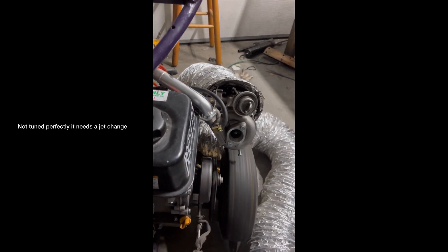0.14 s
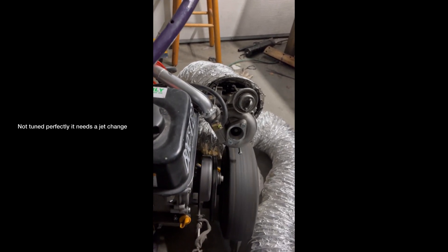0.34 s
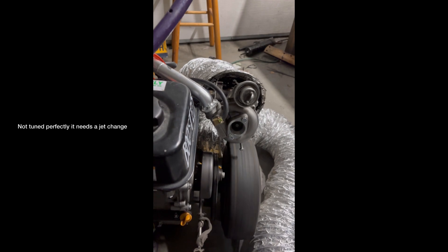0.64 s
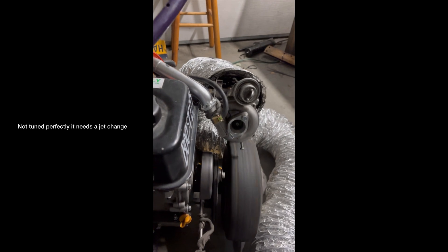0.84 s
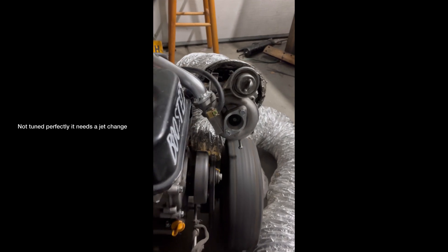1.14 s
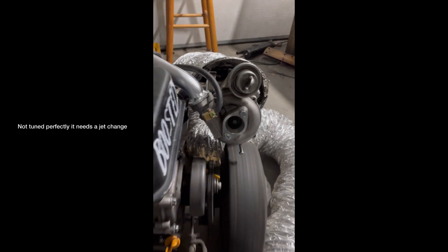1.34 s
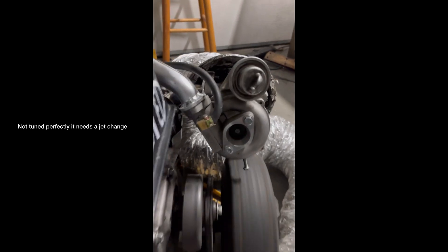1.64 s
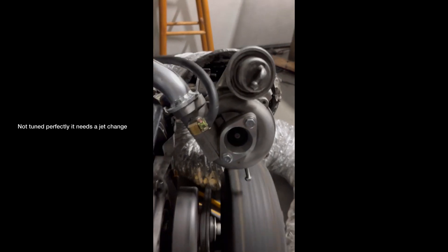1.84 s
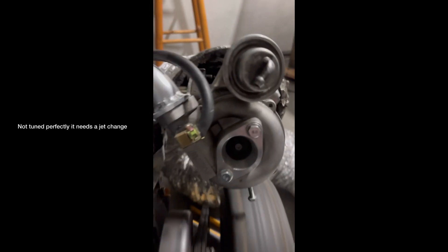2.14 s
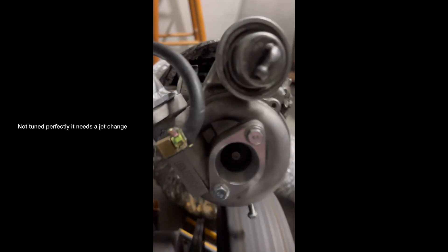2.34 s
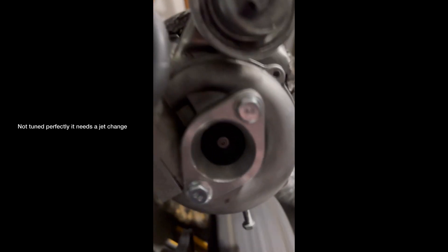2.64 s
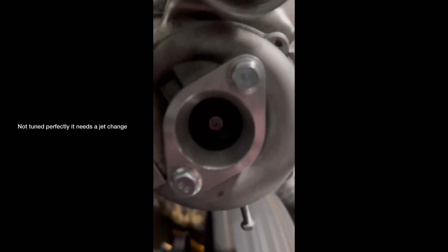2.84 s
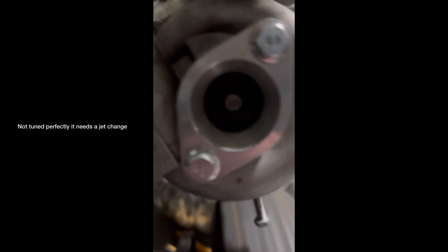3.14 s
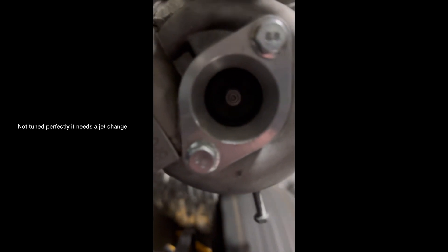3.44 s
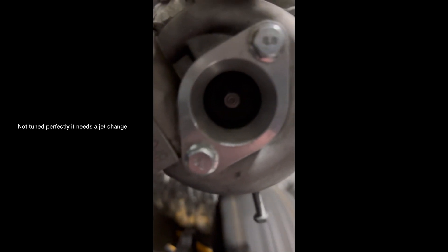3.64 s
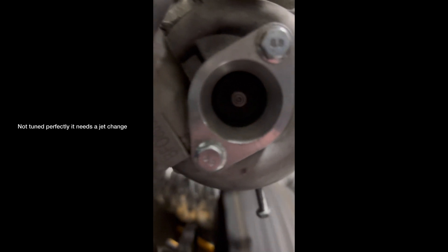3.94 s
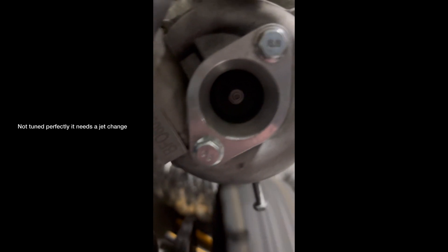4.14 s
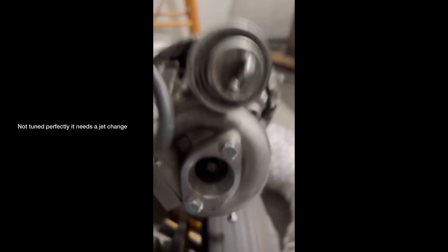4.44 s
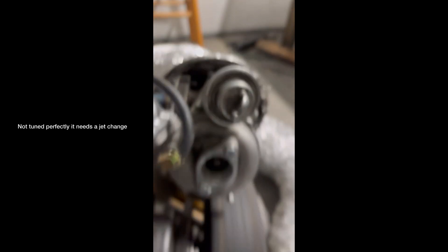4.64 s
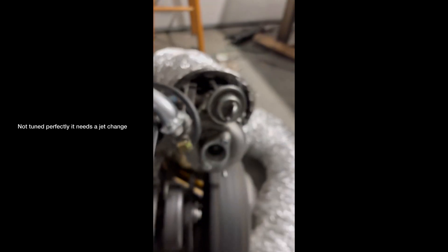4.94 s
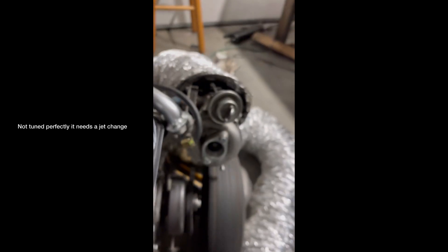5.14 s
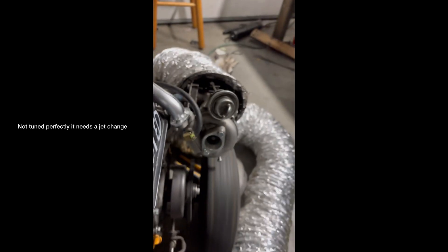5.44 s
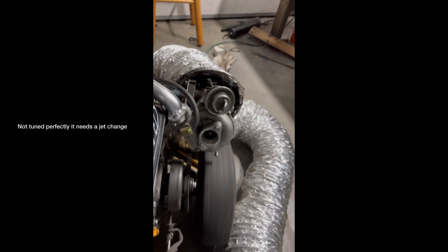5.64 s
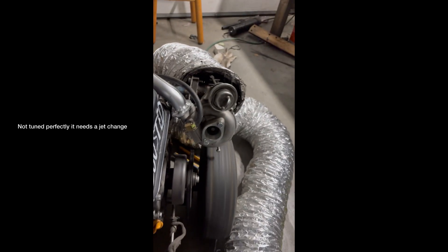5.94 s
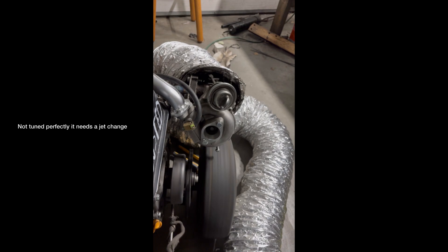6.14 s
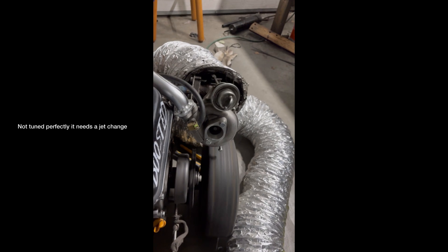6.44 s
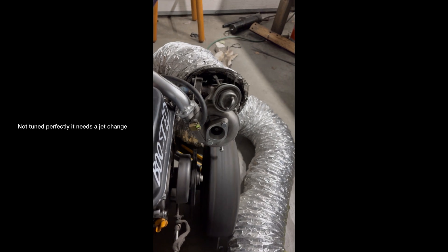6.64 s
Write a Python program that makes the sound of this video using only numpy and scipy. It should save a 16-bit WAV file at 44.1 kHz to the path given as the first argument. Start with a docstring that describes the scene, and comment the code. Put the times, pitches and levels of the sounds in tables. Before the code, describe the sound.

Garage engine climbs from quick chugging to a steady raspy buzz, air fluttering and thumping the microphone up close, then backing away.

```python
"""Turbocharged single in a garage

A small four-stroke single revs up and holds about 5400 rpm while a phone nears the turbo inlet and backs away.
Each cycle strikes resonances: soft low thump, exhaust crack and pop, valve thud and clack, intake gulp.
Coloured noise, swelling with the cycle, makes clatter, gas hiss, turbo rasp and a metallic tick.
Noise bands flutter as moving air; draught, gusts and slaps buffet the microphone; hard walls add a dull wash."""
import sys
import numpy as np
from scipy import signal
from scipy.fft import rfft, irfft
from scipy.io import wavfile
from scipy.ndimage import uniform_filter1d

SR = 44100
rng = np.random.default_rng(int(sys.argv[2]) if len(sys.argv) > 2 else 0)


def transcribe(signal):
    """Save signal, clipped to [-1, 1], as a 16-bit WAV file at the path in sys.argv[1]."""
    frames = np.atleast_2d(signal).T
    limited = np.clip(frames, -1, 1)
    pcm = np.round(limited * 32767).astype(np.int16)
    wavfile.write(sys.argv[1], SR, pcm)


N = 299439
TIME_S = np.arange(N) / SR
FREQ_HZ = np.maximum(np.arange(N // 2 + 1) * SR / N, 1e-3)
SIDES = np.array([[1], [-1]])  # left, right


def undb(db):
    """Decibels to gain."""
    return 10 ** (np.asarray(db) / 20)


def unit(x):
    """Scale to rms 1."""
    return x / np.sqrt(np.mean(x ** 2))


def curves(table):
    """Columns of a timed table, interpolated to every sample."""
    time_s, *columns = np.transpose(table)
    return [np.interp(TIME_S, time_s, column) for column in columns]


def colour(points):
    """Gain at every frequency from (Hz, dB) points, linear in log frequency."""
    hz, db = np.transpose(points)
    return undb(np.interp(np.log(FREQ_HZ), np.log(hz), db))


def resonance(hz, width_hz):
    """Band-pass response, squared for steep skirts."""
    detuning = (FREQ_HZ / hz - hz / FREQ_HZ) * hz / width_hz
    return 1 / (1 + 1j * detuning) ** 2


def walk(rate_hz):
    """Smooth random drift of rms 1, low-passed around rate_hz."""
    noise = rfft(rng.standard_normal(N))
    return unit(irfft(noise * np.exp(-(FREQ_HZ / rate_hz) ** 2), N))


def bump(at_s, length_s):
    """Gaussian swell of peak 1, about length_s long."""
    return np.exp(-2 * ((TIME_S - at_s) / length_s) ** 2)


def puff(cycle, at_turns, length_turns):
    """Swell once per cycle: starts at at_turns, peaks at 1 length_turns later, dies away."""
    age = (cycle - at_turns) % 1 / length_turns
    return age ** 2 * np.exp(2 * (1 - age))


def even(x, span_s=0.013):
    """Divide out the noise's own loudness swings."""
    power = np.mean(x ** 2, axis=0)
    for _ in range(2):
        power = uniform_filter1d(power, int(span_s * SR))
    return x / np.sqrt(power + 1e-9)


# two microphone ports: (frequency [Hz], left minus right [dB], left lead [rad], likeness [0-1])
PORT_PAIR = [(110, -.5, 0, .975), (280, .2, 0, .8), (650, 2.5, -.1, .3), (1300, 2.8, -.2, .35),
             (1800, .5, .1, .65), (2700, -1.5, 2.7, .72), (3600, -1, 1.7, .45), (5100, 0, 1.3, .55),
             (5900, 0, 3.14, .98), (8200, 0, 6.28, .88), (10750, 0, 9.42, .99), (13600, 0, 12.57, .97),
             (15500, 0, 15.3, .9)]


def port_noise(gain):
    """Coloured stereo noise, rms 1: a shared part offset in phase plus a separate part per port."""
    hz, *columns = np.transpose(PORT_PAIR)
    pan_db, lead_rad, alike = (np.interp(FREQ_HZ, hz, column) for column in columns)
    alike = np.clip(alike, 0, 1)
    noise = rfft(rng.standard_normal((3, N)))
    shared = np.sqrt(alike) * noise[0] * np.exp(.5j * SIDES * lead_rad)
    separate = np.sqrt(1 - alike) * noise[1:]
    return unit(irfft((shared + separate) * gain * undb(SIDES * pan_db / 2), N))


def strokes(cycle, at_turns, modes, gain):
    """Spectrum of one slightly uneven pulse per cycle, ringing the given modes."""
    turns = np.arange(int(cycle[-1] - at_turns) + 1)
    jitter_s, size_db = (rng.standard_normal((400, 2)) * [.00002, .6])[turns].T
    place = np.clip((np.interp(turns + at_turns, cycle, TIME_S) + jitter_s) * SR, 0, N - 2)
    # split each pulse over two samples for sub-sample timing
    first, late, size = place.astype(int), place % 1, undb(size_db)
    pulses = np.bincount(first, size * (1 - late), N) + np.bincount(first + 1, size * late, N)
    ringing = sum(np.sign(polarity) * undb(db) * resonance(hz, width_hz)
                  for hz, width_hz, db, polarity in modes)
    return rfft(pulses * gain) * ringing


# pulse positions in the cycle [turns]
THUMP_AT, CRACK_AT, EXHAUST_AT = .005, .216, .244
CHINK_AT, VALVE_AT, INTAKE_AT = .556, .565, .571
# modes rung by each pulse: (frequency [Hz], width [Hz], level [dB], polarity [sign])
CRACK_MODES = [(1410, 1470, -20, -1.0)]
EXHAUST_MODES = [(140.2, 80, -6, -1.0), (467, 460, -8, -1.0), (831, 150, -18, -1.0)]
VALVE_MODES = [(380, 230, 3.5, -1.0)]
CLACK_MODES = [(338, 1450, -14, 1.0), (1430, 1200, -16.5, 1.0), (3100, 460, -43, 1.0)]
INTAKE_MODES = [(67.5, 18.3, 2.4, 1.0), (112.4, 77.5, -1, -1.0), (220, 65, -8, -1.0),
                (359.3, 187, 1.5, 1.0)]
THUMP_MODES = [(445, 440, -17, -1.0)]
# strength of the exhaust-opening crack: (time [s], level [dB])
CRACK_STRENGTH = [(0, 5), (1.7, 1.3), (3.3, 6.1), (6.79, 2.3)]
# strength of the valve clack's hard edge: (time [s], level [dB])
CLACK_STRENGTH = [(0, -17), (1.6, -3), (2.3, 2), (3.3, -1), (3.9, 6.5), (4.5, 2.5), (6.79, -1.5)]
# beat against phone place: (time [s], beat re engine loudness [dB], bass [dB], valve thud [dB])
PHONE_PLACE = [(0, 2, -1, -5.5), (.6, 6.5, 1.5, -4.5), (1.1, 4.5, 0, -2.5), (1.75, 5, 2.5, 1.5),
               (2.3, 5, 3, 3.5), (2.75, 6, -6.5, -1), (3.25, 4, -12, 1), (3.65, 0, -12, 0),
               (3.88, -2.5, -5, -1), (4.25, -1, -5.5, 0), (4.62, 2, -12, 1.5), (5, 4, -2, 3),
               (5.4, 3.5, 1.5, 2), (6.79, 6.5, -2, -2)]
# beat's stereo balance: (frequency [Hz], left minus right [dB])
BEAT_BALANCE = [(130, -.7), (220, -.8), (380, .2), (700, 4), (1280, 4), (2300, -2)]
# standing waves between engine, floor and ducting:
# (frequency [Hz], level at first place [dB], level later [dB])
STANDING_WAVES = [(55.3, 15, 5), (71, -3.5, -8), (89.4, 4.5, 4.5), (136, -3, 1.5), (182, -1, -5),
                  (250, 7.5, 2.5), (299, -0.5, 5), (354, 0.5, -6), (415.5, 5, 5.5), (433, -0.5, 5),
                  (483, 5.5, 0), (546, 4.5, 5), (614, 2.5, -1), (656, 3.5, 8.5), (720, 6.5, 5), (810, 4, 6),
                  (900, -5, -1.5), (924, 7, 5.5), (1140, 0, 0.5), (1350, 1, 1.5), (1820, 4, -5),
                  (2000, -27, 2.5), (2270, -13, -9)]
MOVE_FROM_S, MOVE_TO_S = 1.3, 2.2  # phone leaves its first place


def beat(cycle):
    """Exhaust crack and pop, valve thud and clack, intake gulp and a soft low thump ring once a cycle."""
    place_db, _, valve_db = curves(PHONE_PLACE)
    spectrum = (strokes(cycle, CRACK_AT, CRACK_MODES, undb(curves(CRACK_STRENGTH)[0]))
                + strokes(cycle, EXHAUST_AT, EXHAUST_MODES, 0.99)
                + strokes(cycle, VALVE_AT, VALVE_MODES, undb(valve_db))
                + strokes(cycle, VALVE_AT, CLACK_MODES, undb(curves(CLACK_STRENGTH)[0]))
                + strokes(cycle, INTAKE_AT, INTAKE_MODES, 0.97)
                + strokes(cycle, THUMP_AT, THUMP_MODES, 1))
    spectrum = spectrum * colour(BEAT_BALANCE) ** (SIDES / 2)
    hz, *places = np.transpose(STANDING_WAVES)
    first, later = (irfft(spectrum * colour(np.c_[hz, db]), N) for db in places)
    moved = np.interp(TIME_S, [MOVE_FROM_S, MOVE_TO_S], [0, 1])
    return unit((1 - moved) * first + moved * later) * undb(place_db)


def thin(x, bass_hz=260):
    """Rescale the bass by phone place: close to the inlet the engine loses it."""
    bass = irfft(rfft(x) / (1 + np.square(FREQ_HZ / bass_hz) ** 2), N)
    return x + (undb(curves(PHONE_PLACE)[1]) - 1) * bass


# level of the hollow boom: (time [s], level [dB])
BOOM_STRENGTH = [(0, -34), (.95, -31.5), (1.3, -61), (5, -66), (5.6, -43)]


def boom(cycle, hz=176, width_hz=32):
    """Each exhaust pop rings one narrow hollow mode, lost as the phone moves in."""
    ringing = irfft(strokes(cycle, EXHAUST_AT, [(hz, width_hz, 0, 1)], 1), N)
    return unit(ringing) * undb(curves(BOOM_STRENGTH)[0])


# rattle colour: (frequency [Hz], level per Hz [dB])
CLATTER_COLOUR = [(25, -50), (50, -20), (100, -30), (180, -2), (260, 5.5), (360, -5.5), (700, 0.5),
                  (1100, -1), (1700, -5), (2400, -4), (3300, -8), (5000, -37), (9000, -46)]
SHAKE_AT = .22  # turns


def clatter(cycle, swell=1.23, length_turns=0.12, db=1.06, uneven_db=1.1):
    """Casing, chain and ducting rattle: steady noise shaken unevenly just after each exhaust opening."""
    sizes = undb(uneven_db * rng.standard_normal(int(cycle[-1]) + 2))
    firing = sizes[(cycle - SHAKE_AT + 1).astype(int)]
    shake = 1 + swell * firing * puff(cycle, SHAKE_AT, length_turns)
    return unit(port_noise(colour(CLATTER_COLOUR)) * shake) * undb(db)


# tick colour: (frequency [Hz], level per Hz [dB])
CHINK_COLOUR = [(500, -26), (1000, 7), (1800, -5), (2600, 9.5), (3500, 9), (4500, 2.5), (5300, -23),
                (6500, 11), (9000, 0), (15000, -22)]
# tick level at the phone: (time [s], level [dB])
CHINK_STRENGTH = [(0, -60), (1.4, -53), (2.1, -30), (3.0, -38), (4.2, -36), (4.8, -43), (6.79, -46)]


def chink(cycle, length_turns=0.026, uneven_db=2.5):
    """Short bright noise burst with every valve clack: a metallic tick, loudest beside the turbo."""
    tick = port_noise(colour(CHINK_COLOUR)) * puff(cycle, CHINK_AT, length_turns)
    return unit(tick * undb(uneven_db * walk(40))) * undb(curves(CHINK_STRENGTH)[0])


# rasp swells with boost, fades as the engine settles
RASP_DB, RASP_PEAK_S, RASP_HOLD_S = -29, 2.08, 0.26
RASP_RISE_DB_PER_S, RASP_FALL_DB_PER_S = 24, 24
# whistle when the phone faces the inlet: (peak time [s], length [s], pitch at peak [Hz], level [dB])
WHISTLE_SWELLS = [(2.87, 0.14, 8900, -36.5), (3.96, 0.32, 8680, -38.5)]
WHISTLE_SAG_HZ_PER_S = 550


def turbo(cycle, rasp_hz=4600, rasp_width_hz=3600, length_turns=0.076, uneven_db=1, blur_hz=260):
    """Blowdown rasps through the turbine as pulsed band noise; the wheel adds a breathy, sagging whistle."""
    rising_s = np.maximum(RASP_PEAK_S - TIME_S, 0)
    falling_s = np.maximum(TIME_S - RASP_PEAK_S - RASP_HOLD_S, 0)
    rasp_db = RASP_DB - RASP_RISE_DB_PER_S * rising_s - RASP_FALL_DB_PER_S * falling_s
    rasp = port_noise(resonance(rasp_hz, rasp_width_hz)) * puff(cycle, 0.15, length_turns)
    out = unit(rasp * undb(uneven_db * walk(35))) * undb(rasp_db)
    for at_s, length_s, hz, db in WHISTLE_SWELLS:
        turns = np.cumsum(hz - WHISTLE_SAG_HZ_PER_S * (TIME_S - at_s)) / SR
        whistle = unit(walk(blur_hz) * np.sin(2 * np.pi * turns))
        out = out + whistle * bump(at_s, length_s) * undb(db)
    return out


# hiss colour: (frequency [Hz], level per Hz [dB])
HISS_COLOUR = [(800, 5), (2000, -6), (2700, 4), (4000, 5), (5300, 4.5), (6700, 3.5), (8700, 4), (10700, 1),
               (12600, 8), (14000, 3), (15500, -5)]


def hiss(cycle, swell=0.47, flicker_db=1.0, db=1.08):
    """Steady cooling-air noise plus a gust of gas through the turbo each exhaust stroke."""
    flow = (1 + swell * puff(cycle, 0.29, 0.1)) * undb(flicker_db * walk(33))
    return unit(port_noise(colour(HISS_COLOUR)) * flow) * undb(db)


# airstream flutter: (time [s], centre [Hz], level [dB])
FLUTTER_PATH = [(1.55, 251, -54), (1.85, 285, -36), (2.35, 295, -31), (2.55, 298, -18), (3.03, 273, -16.5),
                (3.22, 328, -21.5), (3.42, 516, -21.5), (3.72, 604, -22), (3.86, 596, -33),
                (3.96, 560, -39), (4.06, 530, -29.5), (4.3, 550, -50)]
SURGE_AT, GULP_AT = .21, .54  # air surges out, in [turns]


def airstream(cycle, pulses, gust_db=2.0, exhaust_swell=1.3, intake_swell=2.2, length_turns=0.08,
              octaves=0.33, throb_db=-7):
    """Air at the phone: noise and beat in a moving band, the noise surging with exhaust and intake."""
    centre_hz, flutter_db = curves(FLUTTER_PATH)
    eddies, throb, spectrum = 0, 0, rfft(pulses)
    for hz in 200 * 2 ** np.arange(0, 2.1, .5):
        band = resonance(hz, hz * 0.69)
        share = np.exp(-.5 * (np.log2(hz / centre_hz) / octaves) ** 2)
        eddies = eddies + share * port_noise(band)
        throb = throb + share * unit(irfft(spectrum * np.abs(band), N))
    surges = (1 + exhaust_swell * puff(cycle, SURGE_AT, length_turns)
              + intake_swell * puff(cycle, GULP_AT, length_turns))
    flutter = unit(even(eddies) * surges * undb(gust_db * walk(75.0)))
    return (flutter + undb(throb_db) * unit(throb)) * undb(flutter_db)


# steady draught while the phone is close: (time [s], level [dB])
DRAUGHT_LEVEL = [(1.62, -56), (1.8, -35), (2.3, -26), (2.92, -19.5), (3.08, -36.5), (3.6, -38.5),
                 (4.45, -39.5), (4.7, -46)]
# single gusts: (peak time [s], level [dB], small eddies re big [dB])
GUST_PEAKS = [(1.735, -25, -8), (1.817, -16, -17), (1.857, -11, -13), (1.95, -16, -12), (2.0, -17, -5),
              (2.092, -15, -7), (2.255, -12.5, -13), (2.307, -12, -16), (2.347, -16, -6), (2.419, -20, -15),
              (2.476, -18, 7), (2.515, -9.5, -14), (2.586, -10.5, -0.5), (2.738, -18, -1), (2.8, -18, 3),
              (2.844, -19, 5), (2.941, -12.5, -7), (2.996, -23, -2), (4.76, -34, 5)]
GUST_RISE_S, GUST_FALL_S = .013, .024
# buffet colour: (frequency [Hz], level per Hz [dB])
BUFFET_COLOUR = [(15, -39), (28, -10), (42, 0), (65, 7), (100, 0.5), (140, -.5), (250, -18.5), (500, -17),
                 (1500, -45)]


def rumble(split_hz=115, patchy_db=2, patchy_hz=25, edge_s=0.085, small_eddies_db=-3):
    """Draught and gusts buffet the microphone: big eddies are low noise, small ones higher noise."""
    start_s, end_s = DRAUGHT_LEVEL[0][0], DRAUGHT_LEVEL[-1][0]
    inside = np.clip(np.minimum(TIME_S - start_s, end_s - TIME_S) / edge_s, 0, 1)
    big = undb(curves(DRAUGHT_LEVEL)[0] + patchy_db * walk(patchy_hz)) * inside
    small = big * undb(small_eddies_db)
    for at_s, db, small_db in GUST_PEAKS:
        gust = undb(db) * bump(at_s, np.where(TIME_S < at_s, GUST_RISE_S, GUST_FALL_S))
        big, small = np.hypot(big, gust), np.hypot(small, gust * undb(small_db))
    low = 1 / (1 + np.square(FREQ_HZ / split_hz) ** 2)
    big_noise = even(port_noise(colour(BUFFET_COLOUR) * np.sqrt(low)))
    small_noise = even(port_noise(colour(BUFFET_COLOUR) * np.sqrt(1 - low)))
    return big * big_noise + small * small_noise


# air puffs slapping the microphone: (time [s], peak level [dB])
SLAP_PEAKS = [(1.801, -5), (1.852, -12), (2.091, -13), (2.345, -11), (2.458, 2), (2.478, -9), (2.584, -6),
              (2.64, -9), (4.76, -22)]
SLAP_HZ, SLAP_WIDTH_HZ = 171, 420


def slaps():
    """Each puff is one quick pressure swing, a dull thud alike at both ports."""
    swing = -resonance(SLAP_HZ, SLAP_WIDTH_HZ)
    blows = sum(undb(db) * np.exp(-2j * np.pi * FREQ_HZ * at_s) for at_s, db in SLAP_PEAKS)
    return irfft(blows * swing, N) / np.abs(irfft(swing, N)).max()


def garage(x, t60_s, db, first_s=0.004, dull_hz=2500):
    """Hard walls and floor: convolve with decaying dull noise whose long waves reach both ports alike."""
    tail = rng.standard_normal((2, N)) * undb(-60 * TIME_S / t60_s) * (TIME_S > first_s)
    response = rfft(tail / np.sqrt(np.sum(tail ** 2) / 2)) / (1 + 1j * FREQ_HZ / dull_hz)
    apart = FREQ_HZ / np.hypot(FREQ_HZ, 600)
    response = apart * response + (1 - apart) * response.mean(axis=0)
    return undb(db) * irfft(rfft(x.mean(axis=0)) * response, N)


# crank speed: (time [s], firing rate [Hz])
FIRING_RATE = [(0, 21.38), (0.15, 27.98), (0.4, 32.7), (0.6, 35.36), (0.7, 36.49), (0.9, 38.07),
               (1.3, 40.59), (1.8, 41.83), (1.9, 42.36), (2.6, 43.88), (2.9, 42.95), (3.1, 43.66),
               (3.4, 43.68), (3.5, 43.94), (3.8, 43.8), (4.0, 44.14), (4.1, 44.55), (4.3, 43.87),
               (4.7, 44.73), (5.1, 44.59), (5.2, 44.15), (5.3, 44.72), (5.4, 44.39), (5.6, 44.62),
               (5.8, 45.26), (5.9, 45.1), (6.3, 45.18), (6.5, 44.81), (6.6, 45.09), (6.79, 44.69)]
WANDER_TURNS, WANDER_HZ = .0013, 6  # crank runs ahead or behind: rms, rate
# engine balance at the phone: (time [s], left minus right [dB])
ENGINE_AIM = [(0, 1.1), (1.3, 0.6), (2.8, 1), (3.7, -0.5), (4.9, 1.1), (6.79, 0.8)]
# engine loudness, followed by beat, clatter and hiss: (time [s], level [dB])
ENGINE_LOUDNESS = [(0.05, -31), (0.23, -30.5), (1.6, -24), (1.99, -22), (3.44, -27), (4.13, -27.5),
                   (5.01, -32.5), (6.68, -30), (6.7, -30.5)]


def scene():
    """An unsteady crank drives every engine layer; room, moving air and buffeting are added."""
    cycle = np.cumsum(curves(FIRING_RATE)[0]) / SR + WANDER_TURNS * walk(WANDER_HZ)
    pulses = beat(cycle)
    body = thin(pulses + clatter(cycle)) * undb(SIDES * curves(ENGINE_AIM)[0] / 2)
    running = (body + hiss(cycle)) * undb(curves(ENGINE_LOUDNESS)[0])
    engine = running + turbo(cycle) + chink(cycle) + boom(cycle)
    room = garage(engine, t60_s=.35, db=-21)
    return engine + room + airstream(cycle, pulses) + rumble() + slaps()


LOW_CUT_HZ, TOP_HZ = 40, 15500


def record(dry):
    """The phone drops the deepest bass, rounds the loudest peaks and cuts the top."""
    lean = irfft(rfft(dry) / np.sqrt(1 + np.square(LOW_CUT_HZ / FREQ_HZ) ** 4), N)
    rounded = lean / (1 + lean ** 4) ** .25
    top_cut = signal.ellip(10, .2, 80, TOP_HZ, fs=SR, output="sos")
    return signal.sosfilt(top_cut, rounded)


dry = scene()
out = record(dry)
transcribe(out)
```